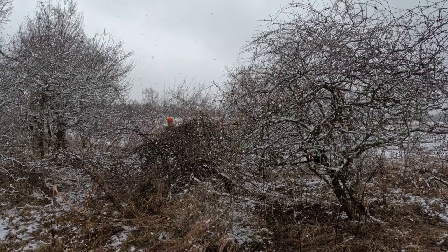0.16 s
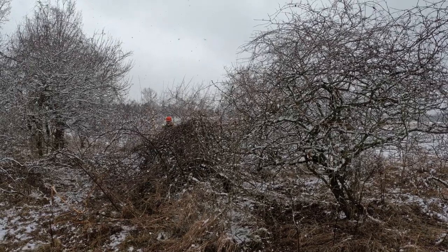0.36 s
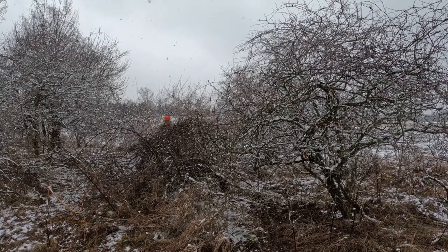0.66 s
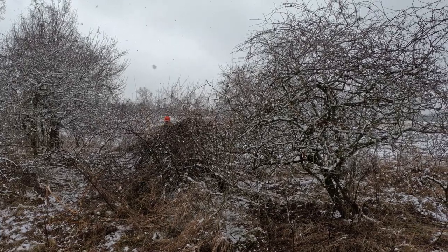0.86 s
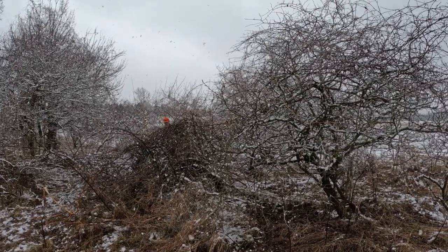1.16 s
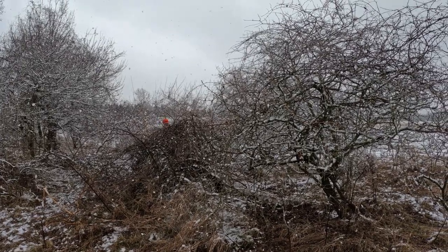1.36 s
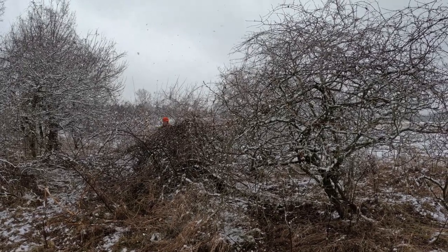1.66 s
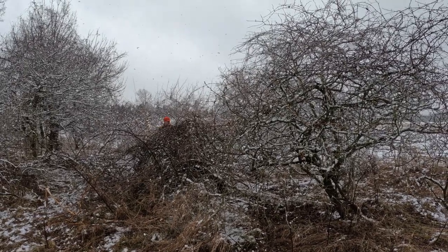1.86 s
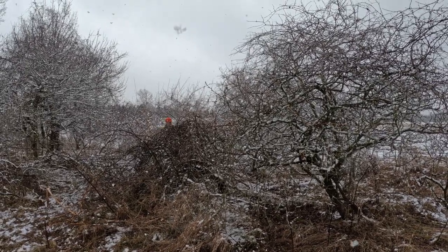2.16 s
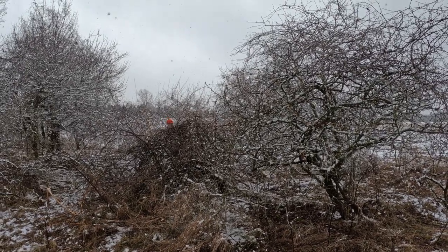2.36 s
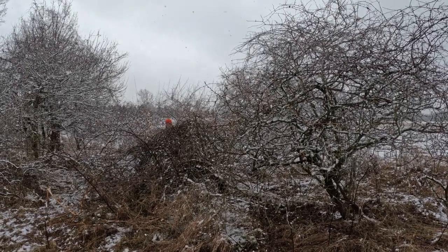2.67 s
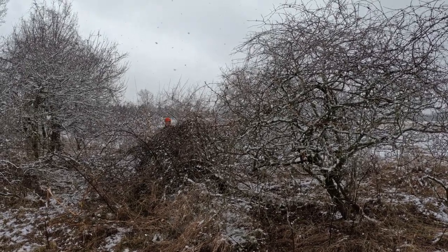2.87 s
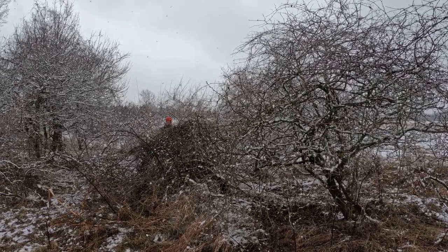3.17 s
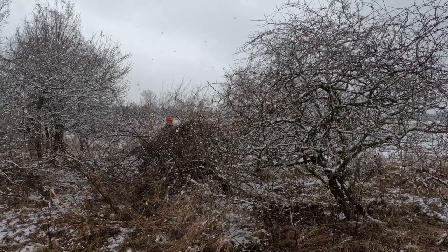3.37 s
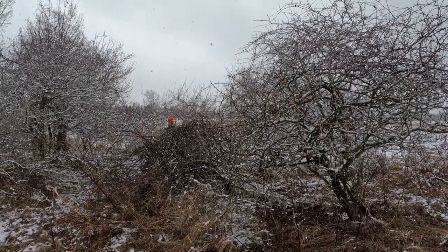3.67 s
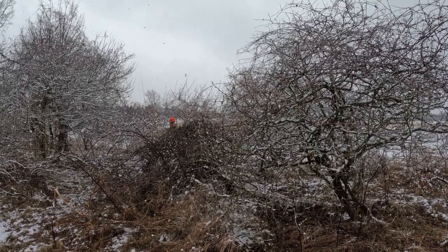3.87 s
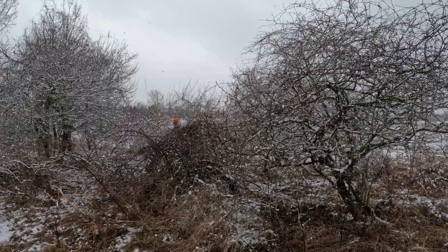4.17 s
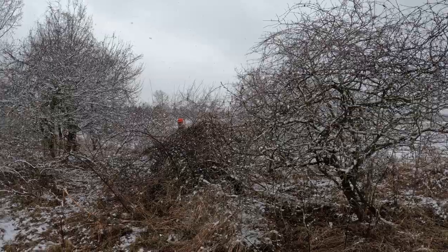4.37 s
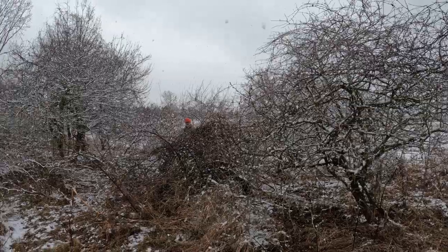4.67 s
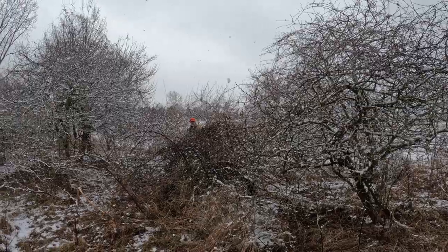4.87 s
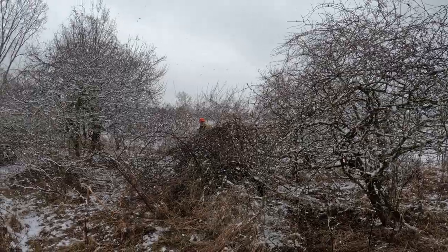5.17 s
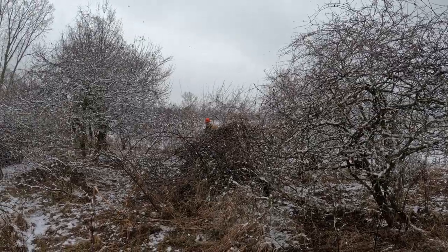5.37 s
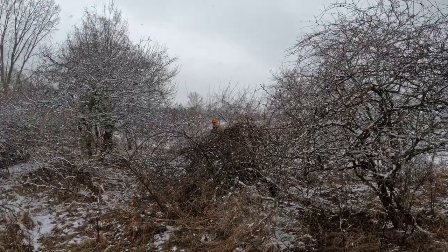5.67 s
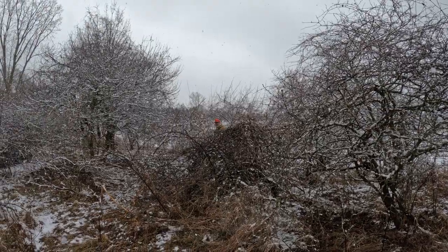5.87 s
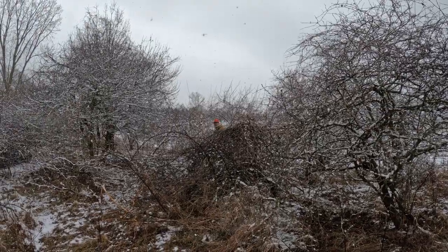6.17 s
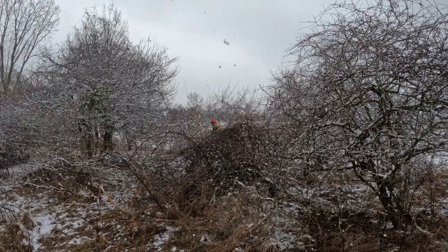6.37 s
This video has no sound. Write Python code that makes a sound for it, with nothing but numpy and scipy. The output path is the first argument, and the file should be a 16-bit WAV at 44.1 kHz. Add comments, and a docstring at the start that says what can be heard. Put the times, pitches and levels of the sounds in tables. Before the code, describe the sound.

Dry branches crackle, scrape and snap as a person forces a way through winter brush, boots crunching dead stalks and thin snow outdoors.

```python
"""In a dry thorn thicket on a winter day, someone pushes through the stems some metres away.
Twigs snap and splinter as damped modes struck by noise; scraping thorns and crushed dead wood and
snow are dense sums of tiny ringing fractures, and dull blows under the boots are resonant bursts.
Decaying noise tails scatter all of it among the stems; shaped diffuse noise behind it gives a low
rumble, an uneven rush of far traffic mixed with soft litter rustle, and a faint hiss."""
import sys
import numpy as np
from scipy import signal
from scipy.fft import rfft, irfft, next_fast_len
from scipy.io import wavfile
from scipy.ndimage import uniform_filter1d, map_coordinates

SR = 44100
rng = np.random.default_rng(int(sys.argv[2]) if len(sys.argv) > 2 else 0)


def inscribe(sig):
    """Save sig as 16-bit PCM at rate SR to the path in sys.argv[1].

    A 1-D sig is mono; a 2-D sig holds one channel per row.
    Samples are clipped to [-1, 1] before scaling.
    """
    pcm = np.round(np.clip(np.atleast_2d(sig).T, -1, 1) * 32767)
    wavfile.write(sys.argv[1], SR, pcm.astype(np.int16))


N = 286826  # samples, about 6.5 s


def amp(db):
    """Logarithmic level: decibels to an amplitude ratio."""
    return 10 ** (np.asarray(db) / 20)


def unit(x):
    """Power normalisation: scale to rms 1."""
    return x / np.sqrt(np.mean(x ** 2) + 1e-20)


def burst(x):
    """Energy normalisation: scale a short sound to the energy of 10 ms at rms 1."""
    energy = np.sum(x ** 2) + 1e-20
    return x * np.sqrt(SR / 100 / energy)


def along(points, hz):
    """Logarithmic frequency scale: interpolate (f/Hz, value) points on it."""
    f, value = np.transpose(points)
    return np.interp(np.log(hz + 1), np.log(f + 1), value)


def curves(rows):
    """Piecewise-linear envelopes: one value per sample for each column after the time."""
    s, *columns = np.transpose(rows)
    return [np.interp(np.arange(N) / SR, s, column) for column in columns]


def wobble(rate):
    """Slow random modulation: a smooth curve through `rate` random knots a second."""
    knots = rng.standard_normal(int(N * rate / SR) + 4)
    return map_coordinates(knots, [np.arange(N) * rate / SR])


def filtered(x, response):
    """Linear filtering: multiply the spectrum of x by a complex response of frequency."""
    size = x.shape[-1]
    m = next_fast_len(size + 4096)
    return irfft(rfft(x, m) * response(np.fft.rfftfreq(m, 1 / SR)), m)[..., :size]


def coloured(x, spectrum):
    """Spectral shaping: filter x by a (f/Hz, gain/dB) curve."""
    return filtered(x, lambda hz: amp(along(spectrum, hz)))


def resonance(f, hz, q):
    """Damped oscillator: band-pass response of one mode at hz with quality factor q."""
    damping = 1j * f * hz / q
    return damping / (hz * hz - f * f + damping)


def add(track, s, sound):
    """Superposition: mix a sound into a track from time s."""
    part = track[max(round(s * SR), 0):][:len(sound)]
    part += sound[:len(part)]


# Left-right coherence of the background: f/Hz, coherence (1 = identical)
COHERENCE = [(70, 1), (150, 1), (400, 0.6), (1300, 0.35), (3500, 0.45), (7000, 0.91), (14000, 0.44)]


def air(spectrum):
    """Partial coherence: mid and side noise in proportion make a diffuse stereo field of rms 1."""
    def mid_side(hz):
        angle = np.arccos(np.clip(along(COHERENCE, hz), -1, 1)) / 2
        return amp(along(spectrum, hz)) * [np.cos(angle), np.sin(angle)]
    mid, side = filtered(rng.standard_normal((2, N)), mid_side)
    return unit(np.array([mid + side, mid - side]))


# Relative spectral densities of rumble, 1 kHz rush and hiss: f/Hz, density/dB
RUMBLE_SPECTRUM = [(10, -21), (25, -10), (40, -3.5), (52, -0.5), (70, -2), (90, -6), (115, -10.5),
                   (140, -17), (165, -15), (230, -26.5), (330, -48.5), (700, -65)]
RUSH_SPECTRUM = [(150, -17), (400, -15.5), (700, -7.5), (950, 1), (1300, 0.5), (1700, -2.5), (1950, -7.5),
                 (2400, -16.5), (6000, -28.5)]
HISS_SPECTRUM = [(1000, 11), (3800, -17), (5800, 6.5), (8000, 2), (10000, 2.5), (13000, -5), (16000, -19)]
# Slow swell of the rumble, before trim and wobble: t/s, level/dB
RUMBLE_SWELL = [(0, -47), (1.2, -44), (2.3, -49.5), (3.2, -46.5), (4.3, -50.5), (4.9, -48), (5.4, -50),
                (6.5, -49.5)]
# Uneven level of the 1 kHz rush, far traffic with soft litter rustle mixed in,
# before trim and wobble: t/s, level/dB
RUSH_LEVEL = [(0, -60), (1.6, -60), (2.15, -54), (2.65, -61.5), (3.2, -56), (3.7, -58.5), (4.7, -60.5),
              (5.6, -57.5), (6.2, -63.5), (6.5, -65.5)]


def background(rumble_db=-1, rush_db=-1, hiss_db=-73, swell_db=1.77):
    """Amplitude-modulated noise: swelling rumble, uneven rush of traffic and litter, steady hiss."""
    low_db, = curves(RUMBLE_SWELL)
    uneven_db, = curves(RUSH_LEVEL)
    rumble = amp(low_db + rumble_db + swell_db * wobble(16)) * air(RUMBLE_SPECTRUM)
    rush = amp(uneven_db + rush_db + 0.72 * wobble(2.92)) * air(RUSH_SPECTRUM)
    return rumble + rush + amp(hiss_db) * air(HISS_SPECTRUM)


# Pushes of the body through the brush, before the layer trims: full effort t/s, rise/s, hold/s,
# scrape level/dB, boot weight level/dB, treble tilt/dB (thin twigs are brighter)
BODY_PUSHES = [(0, 0.098, 0.0067, -61.5, -59.5, 2), (0.348, 0.18, 0.52, -57.5, -64.5, -3),
               (0.927, 0.22, 0.1, -47, -57, -0.5), (1.238, 0.29, .14, -50.5, -57.5, 6),
               (1.646, 0.23, 0.27, -59.5, -63.5, 0.5), (2.325, 0.35, 0.072, -47, -54.5, -0.5),
               (3.05, 0.34, 0.28, -56.5, -63.5, -2), (3.5, 0.11, .22, -54.5, -60.5, -0.5),
               (3.909, 0.43, .14, -54, -58, -1.5), (4.514, 0.46, 0.38, -66, -63, -4.5),
               (5.323, 0.41, 0.15, -50, -58, -3), (5.728, 0.47, 0.16, -46, -52, -3)]
RISE_DB, RELEASE_DB_PER_S = 21, 104  # climb during the rise; settling of the stems after the hold


def effort():
    """Exponential build-up and decay, summed as power: scrape dB, boot weight dB and tilt dB."""
    t = np.arange(N) / SR
    drag, tread, tilt = np.zeros((3, N))
    for s, rise, hold, scrape_db, weight_db, tilt_db in BODY_PUSHES:
        before_db = -RISE_DB * np.maximum(s - t, 0) / rise
        after_db = -RELEASE_DB_PER_S * np.maximum(t - s - hold, 0)
        shape_db = before_db + after_db
        power = amp(scrape_db + shape_db) ** 2
        drag += power
        tilt += power * tilt_db  # power-weighted mean of the tilts
        tread += amp(weight_db + shape_db) ** 2
    return 10 * np.log10(drag + 1e-20), 10 * np.log10(tread + 1e-20), tilt / (drag + 1e-20)


def grains(rate, low_hz, high_hz, cycles, spread_db):
    """Shot noise: random tiny fractures, each ringing a few cycles at its own pitch; rms 1."""
    count = int(rate * N / SR)
    when, stem, phase = rng.random((3, count, 1))
    hz = low_hz * (high_hz / low_hz) ** stem
    size = hz * amp(spread_db * np.minimum(rng.standard_normal((count, 1)), 2))
    step = np.arange(int(4 * cycles * SR / low_hz))
    age = step / SR * hz / cycles
    envelope = size * age * np.exp(-3 * age)
    ring = envelope * np.sin(2 * np.pi * (hz * step / SR + phase))
    position = (when * N).astype(int) + step
    return unit(np.bincount(position.ravel(), ring.ravel(), N)[:N])


def patchy(x, depth_db):
    """Time-frequency modulation: every few milliseconds other stems, each with its own colour."""
    z = signal.stft(x, nperseg=128)[2]
    field = rng.standard_normal(z.shape)
    for _ in range(2):
        field = uniform_filter1d(uniform_filter1d(field, size=4, axis=0), size=4, axis=1)
    gain = amp(depth_db * np.minimum(unit(field), 2.5))
    return unit(signal.istft(z * gain, nperseg=128)[1][:N])


# Colour of thorns and twigs on cloth: f/Hz, gain/dB
TWIG_COLOUR = [(800, -14), (1500, -4), (2300, -4), (3200, -2.5), (4400, -5), (5800, -2), (7400, -4.5),
               (10000, -6.5), (12000, -6.5), (16000, -24)]


def rustle(drag_db, tilt_db, scrape_db=0.5, tick_db=-6, catch_db=2.5, hinge_hz=3800):
    """Stick-slip friction: thorns catch and slip on cloth, a dense scrape with single twig ticks."""
    scrape = grains(rate=9000, low_hz=1100, high_hz=15000, cycles=1.5, spread_db=2)
    scrape = patchy(scrape, depth_db=3.2)
    ticks = grains(rate=200, low_hz=2000, high_hz=11000, cycles=3.5, spread_db=6)
    catching = unit(amp(catch_db * wobble(47)))
    twigs = amp(scrape_db) * catching * unit(coloured(scrape, TWIG_COLOUR))
    twigs += amp(tick_db) * unit(coloured(ticks, TWIG_COLOUR))
    # split at the hinge, so that the tilt can make thin twigs brighter
    thick = filtered(twigs, lambda hz: 1 / (1 + (hz / hinge_hz) ** 4))
    thin = twigs - thick
    return amp(drag_db - tilt_db / 2) * thick + amp(drag_db + tilt_db / 2) * thin


# Colours of crushed stalks and of the soil: f/Hz, gain/dB
LITTER_COLOUR = [(120, -12), (250, -26), (480, -12), (1000, 2.5), (1700, 2.5), (2600, -10.5), (5000, -59),
                 (10000, -55)]
SOIL_COLOUR = [(90, -14), (160, 3), (260, -2.5), (420, -6.5), (700, -3), (1500, -33), (4000, -68)]


def boots(tread_db, crunch_db=3.0, clump_db=2, soil_db=-51, heft=1.34):
    """Brittle collapse: stalks and snow give way in clumps; heavy steps bring out the soil."""
    stalks = grains(rate=1100, low_hz=300, high_hz=2910, cycles=1.7, spread_db=5)
    soil = grains(rate=400, low_hz=135, high_hz=667, cycles=1.0, spread_db=3.5)
    clumps = unit(amp(clump_db * wobble(45)))
    weight_db = soil_db + heft * (tread_db - tread_db.max())  # falls faster than the tread
    crunch = amp(tread_db + crunch_db) * unit(coloured(stalks, LITTER_COLOUR))
    return clumps * (crunch + amp(weight_db) * unit(coloured(soil, SOIL_COLOUR)))


# small twigs: levels against the scrape and the boot weight
SMALL_PER_S, SMALL_DB, SMALL_KNOCK_DB, SMALL_SPREAD_DB = 22, -2, -2.5, 3
SMALL_HZ, SMALL_SPREAD_OCT = 4450, 0.5


def small_snaps(drag_db, tread_db):
    """Random point process: rows for snaps(), small twigs breaking as loud as the push is hard."""
    count = int(SMALL_PER_S * N / SR)
    when, clean = rng.random((count, 2)).T
    size, pitch, wood = np.clip(rng.standard_normal((count, 3)), -2, 2).T
    at = ((np.arange(count) + when) / count * N).astype(int)  # one in each equal slot of time
    level_db = drag_db[at] + SMALL_DB + SMALL_SPREAD_DB * size
    hz = SMALL_HZ * 2 ** (SMALL_SPREAD_OCT * pitch)
    knock_db = tread_db[at] + SMALL_KNOCK_DB + SMALL_SPREAD_DB * wood
    return np.transpose([at / SR, level_db, hz, clean, knock_db])


# Loud breaking twigs, levels over 10 ms before air colour and wood trim: t/s, level/dB, f/Hz,
# share of clean break against splintering (0-1, limited when played), wood knock level/dB
LOUD_SNAPS = [(0.2995, -48, 6000, 1, -61), (0.3513, -57, 2980, .3, -52.5), (0.5382, -48.5, 2920, 0.14, -50),
              (0.7722, -46.5, 4500, 0, -66), (0.8105, -48, 4730, 0.1, -61), (0.8938, -42.5, 4180, 0.7, -65),
              (0.9103, -40, 3700, .25, -60), (0.9333, -35, 4850, 0.9, -57), (0.9713, -33, 4200, 0.5, -50),
              (1.0636, -30.5, 4450, 0, -46), (1.083, -35.5, 5030, 0.6, -40.5),
              (1.1238, -38.5, 4740, 0.45, -42.5), (1.131, -43, 6300, 0.9, -65),
              (1.185, -38.5, 6250, 0.1, -52), (1.2231, -35, 4650, 0.04, -55), (1.2311, -34.5, 5400, 0, -50),
              (1.3168, -41, 4170, 0.37, -58), (1.342, -39.5, 6000, 0.24, -47.5),
              (1.3683, -41, 5400, 0.17, -72), (1.3789, -47, 5400, 0.4, -46.5), (1.4663, -38, 5750, .6, -45),
              (1.4833, -39.5, 6300, 0.67, -48), (1.8798, -44, 6600, 0.57, -55), (2.0835, -44, 5000, 0, -43),
              (2.1692, -57, 4200, 0.2, -46), (2.2388, -44, 2960, .85, -70), (2.2564, -40, 3530, 0.7, -64),
              (2.3024, -40.5, 3300, 0, -52), (2.3215, -37, 4900, 0.3, -52), (2.3813, -43, 5340, 0.6, -61),
              (2.4368, -33, 3940, 0.97, -44), (2.4747, -41, 6200, 0.4, -45), (2.6067, -57, 5500, 0.7, -65),
              (2.7216, -43.5, 7100, .35, -58), (2.845, -68, 2400, 0, -50.5),
              (3.0224, -53, 3170, 0.9, -49.5), (3.2805, -37, 3120, 0.2, -48),
              (3.4671, -53.5, 3270, 0.7, -44.5), (3.549, -47, 5160, 0.04, -68),
              (3.6941, -40.5, 4060, 0.04, -53), (3.793, -47, 2200, 0.94, -61),
              (3.881, -48.5, 3950, 0, -46.5), (4.0582, -35.5, 4700, 0.3, -43),
              (4.2151, -46, 8240, 0.35, -60), (4.2572, -45.5, 4400, 0.74, -45.5),
              (4.368, -61.5, 5600, 0, -66), (4.709, -57.5, 2400, .85, -71), (4.8482, -46.5, 2830, 0.3, -53),
              (5.179, -51, 3300, 0, -43), (5.2587, -42.5, 4730, 0.34, -50), (5.319, -43, 5500, 0.04, -43),
              (5.3523, -40, 4660, 1, -41), (5.406, -47.5, 3670, .6, -49.5), (5.4424, -42, 3800, 0, -43.5),
              (5.5059, -44.5, 3200, 0.6, -65), (5.5446, -39.5, 3160, .4, -44.5),
              (5.6566, -37.5, 4600, 0.94, -63), (5.6649, -34, 5430, .65, -63), (5.7782, -46, 6040, .6, -62),
              (5.7969, -31, 6000, 0.83, -52), (5.9153, -56, 5700, .5, -44), (5.956, -49, 3850, 0.65, -49),
              (6.0266, -47, 3950, 0.68, -52), (6.1126, -56, 2900, 0, -49)]
# Colour of a crack after its way through the air: f/Hz, gain/dB
CRACK_COLOUR = [(200, -7.5), (1500, 3.5), (7000, 2), (10000, 4.5), (12000, 0), (16000, -13)]


def snaps(rows, twig_q=1.5, splinter_q=0.41, wood_hz=850, wood_t60=0.028, wood_db=-2, debris_db=-18):
    """Brittle fracture exciting damped modes: fibres tear, the twig breaks, the branch knocks."""
    cracks, wood = np.zeros(N), np.zeros(N)
    lead = SR // 250  # tearing starts 4 ms ahead of the break
    t = (np.arange(SR // 7) - lead) / SR
    # a few milliseconds of tearing, then a faint trail of falling splinters
    tearing = np.exp(-abs(t) / np.where(t < 0, .0017, .0035))
    debris = amp(debris_db - 60 * abs(t) / .16) * (t > 0)
    for s, db, hz, clean, knock_db in rows:
        clean = np.clip(clean, 0, .85)
        rupture, fibres, shake = rng.standard_normal((3, len(t)))
        spurts = map_coordinates(rng.standard_normal(len(t)), [np.arange(len(t)) * 700 / SR])

        rupture = rupture * np.exp(-abs(t) / (0.0018 * (1 - clean)))  # the cleaner, the shorter
        kick = burst(filtered(rupture, lambda f: resonance(f, hz, twig_q) * resonance(f, hz, 0.19)))
        fibres = fibres * (amp(1.3 * spurts) * tearing + amp(9.6 * spurts) * debris)
        splinters = burst(filtered(fibres, lambda f: resonance(f, hz, splinter_q)))
        crack = np.sqrt(clean) * kick + np.sqrt(1 - clean) * splinters

        stem_hz = hz * np.exp(rng.normal(-0.16, 0.33))  # every stem adds a ring of its own
        crack = filtered(crack, lambda f: 1 + 0.96 * resonance(f, stem_hz, 27))
        add(cracks, s - lead / SR, amp(db) * burst(crack))

        shake = shake * (t >= 0) * amp(-60 * abs(t) / wood_t60)
        knock = filtered(shake, lambda f: resonance(f, wood_hz, 0.39) ** 2)
        add(wood, s - lead / SR, amp(knock_db + wood_db) * burst(knock))
    return coloured(cracks, CRACK_COLOUR) + wood


def crush(hz, q, t60):
    """Noise-excited resonance: a short muffled blow that rings around hz."""
    t = np.arange(SR // 10) / SR
    shock = rng.standard_normal(len(t)) * amp(-60 * t / t60)
    return burst(filtered(shock, lambda f: resonance(f, hz, q) ** 2))


# Dull blows under the boots, high on buried sticks and low on bare ground:
# t/s, level/dB (over 10 ms), f/Hz
BOOT_BLOWS = [(1.126, -50.5, 286), (1.398, -52.5, 330), (2.085, -50, 284), (2.299, -52, 290),
              (2.473, -46, 1400), (3.654, -43.5, 1040), (3.695, -44, 1010), (3.956, -50.5, 290),
              (4.255, -52, 288), (5.121, -47.5, 1180), (5.174, -47, 600), (5.232, -44.5, 830),
              (5.451, -49, 534), (5.767, -49.5, 292), (5.855, -43.5, 905), (5.864, -46.5, 302),
              (5.972, -44, 916)]


def knocks():
    """Impact excitation: sticks give way under the boots, and the ground takes the weight."""
    out = np.zeros(N)
    for s, db, hz in BOOT_BLOWS:
        add(out, s, amp(db) * crush(hz, q=1.34, t60=0.021))
    return out


# Phase between the microphone ports for direct sound: f/Hz, left lead/rad
PORT_PHASE = [(200, 0.015), (1300, 0.18), (2500, -0.71), (4500, -0.58), (7000, 0.056), (12000, 0.54)]


def thicket(x, near_db=-9.5, far_db=-16, far_t60=0.27):
    """Multiple scattering: near stems and farther trees answer differently from place to place."""
    t = np.arange(SR // 3) / SR
    wet = np.zeros((2, N))
    hop = SR // 4  # a fresh pair of stereo tails every quarter second
    for start in range(0, N, hop):
        near, far = rng.standard_normal((2, 2, len(t))) * (1 - np.exp(-t / 0.0025))
        near = near * amp(-60 * t / .07)
        far = far * amp(-60 * t / far_t60)
        tail = amp(near_db) * near / np.linalg.norm(near[0])
        tail += amp(far_db) * far / np.linalg.norm(far[0])
        for side, answer in zip(wet, tail):
            add(side, start / SR, signal.fftconvolve(x[start:start + hop], answer))
    opposite = np.array([[1], [-1]])
    direct = filtered(x, lambda hz: np.exp(.5j * along(PORT_PHASE, hz) * opposite))
    return direct + wet


def scene():
    """Superposition of sources: the walker in the thicket, over the open-air background."""
    drag_db, tread_db, tilt_db = effort()
    outdoors = background()
    walker = snaps(LOUD_SNAPS) + knocks()
    walker += rustle(drag_db, tilt_db) + boots(tread_db)
    walker += snaps(small_snaps(drag_db, tread_db))
    return thicket(walker) + outdoors


# Common microphone response: f/Hz, gain/dB
MICROPHONE_RESPONSE = [(7300, 1.5), (8300, -3), (10000, -1.5), (11000, -8), (14200, -8.5), (15800, -21)]
# Level difference between the ports: f/Hz, left minus right/dB
PORT_BALANCE = [(150, -0.5), (1200, 1.4), (2400, -1), (4400, -0.5), (8000, .5), (13000, 3)]
TOP_HZ = 15800  # band limit


def record(dry):
    """Transducer response and band limiting: each microphone port has its own colour."""
    opposite = np.array([[1], [-1]])
    ports = coloured(dry, MICROPHONE_RESPONSE)
    ports = filtered(ports, lambda hz: amp(along(PORT_BALANCE, hz) / 2 * opposite))
    return filtered(ports, lambda hz: hz < TOP_HZ)


dry = scene()
out = record(dry)
inscribe(out)
```